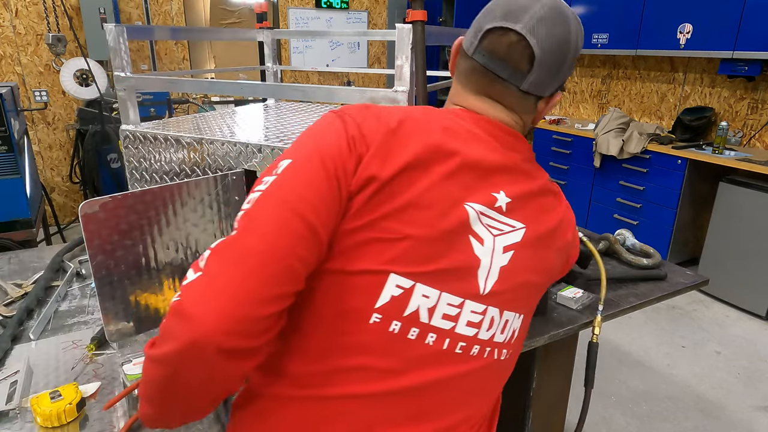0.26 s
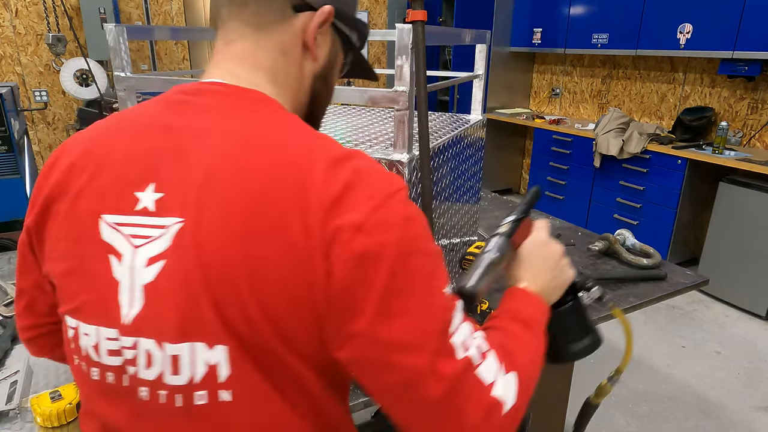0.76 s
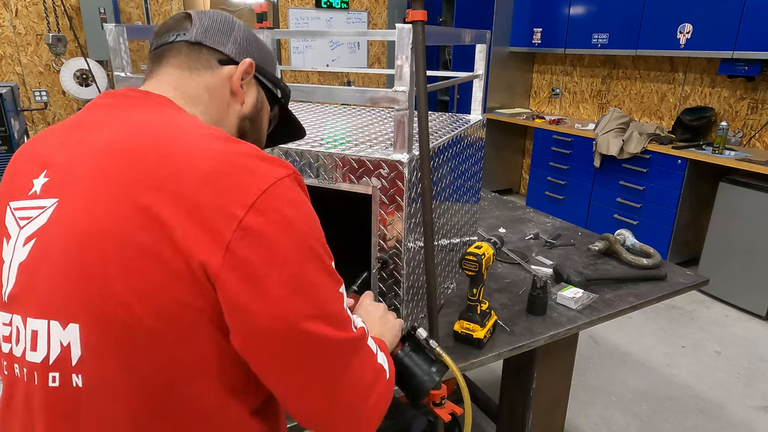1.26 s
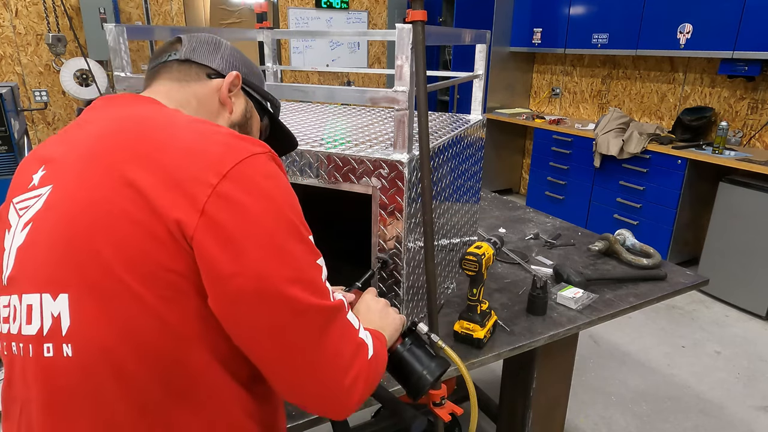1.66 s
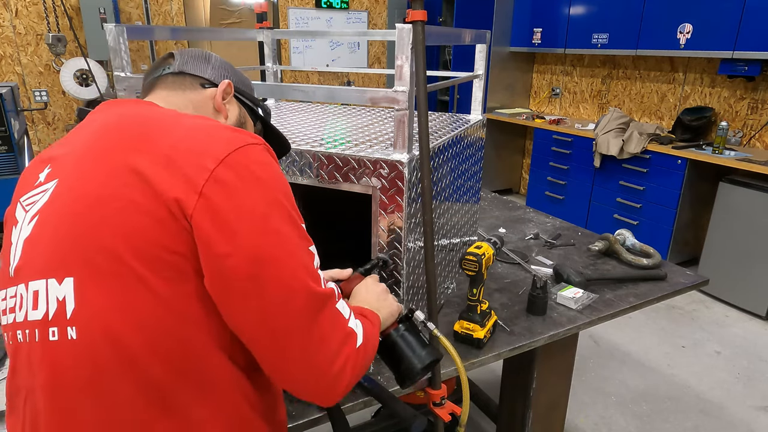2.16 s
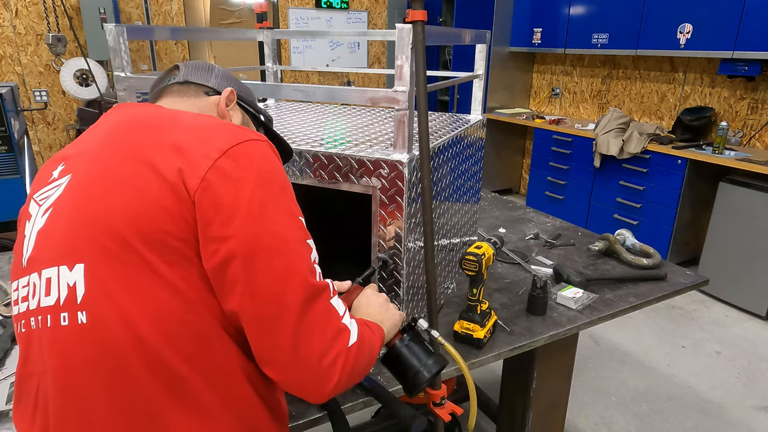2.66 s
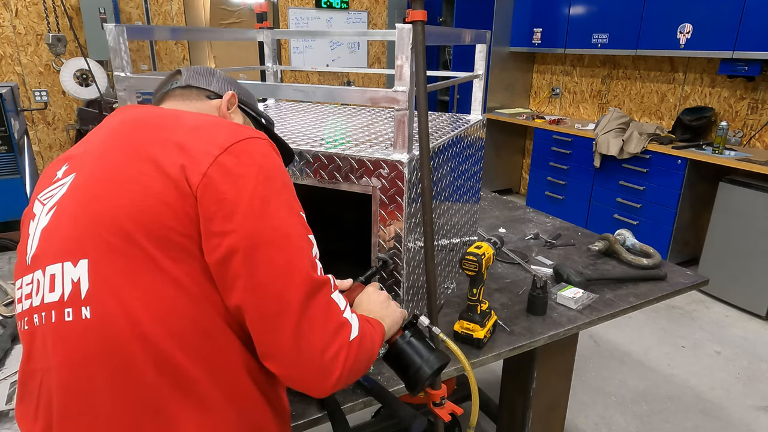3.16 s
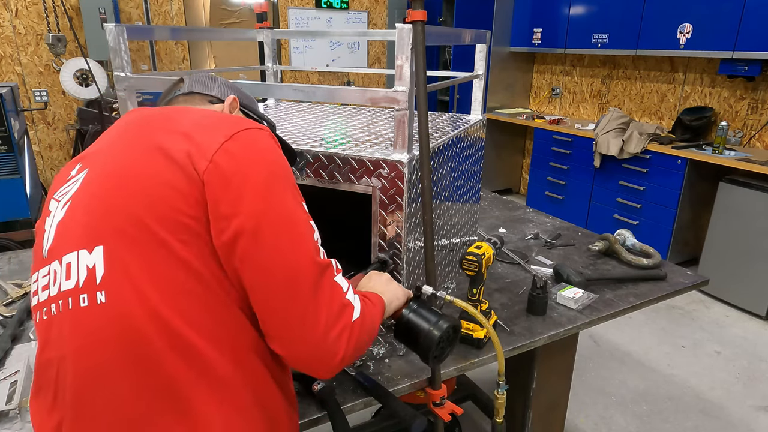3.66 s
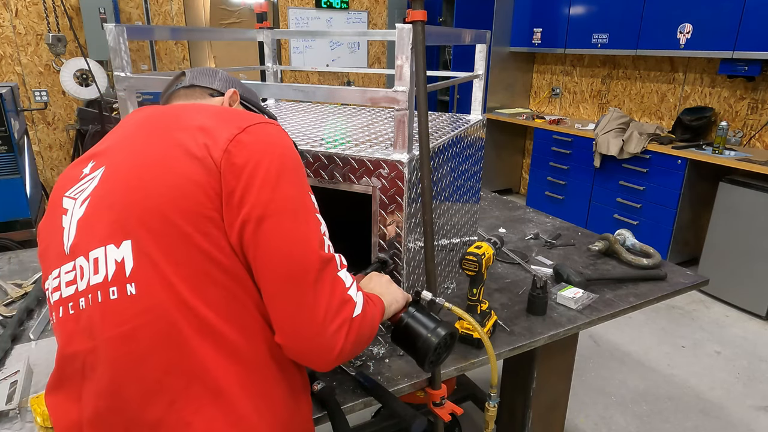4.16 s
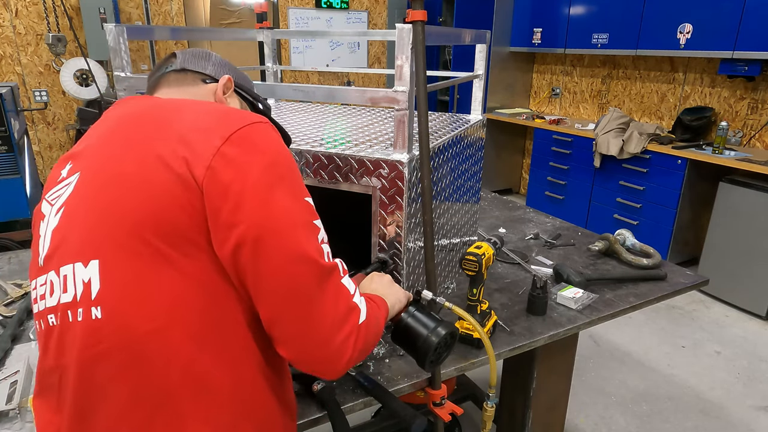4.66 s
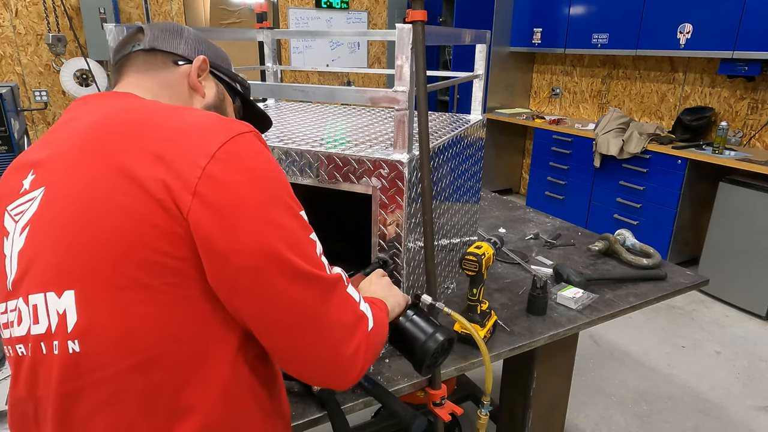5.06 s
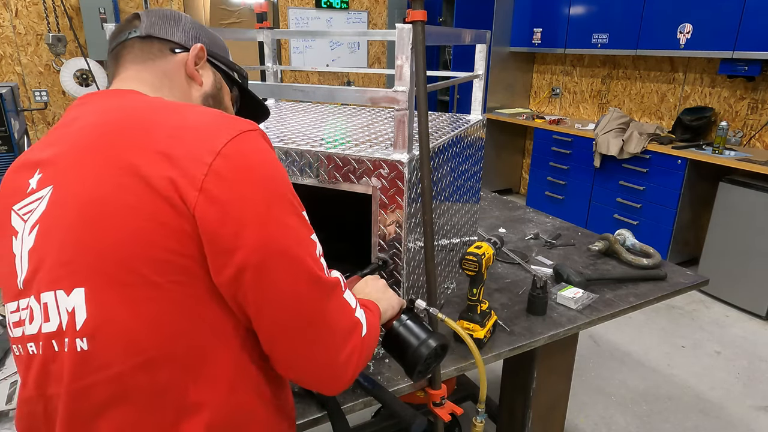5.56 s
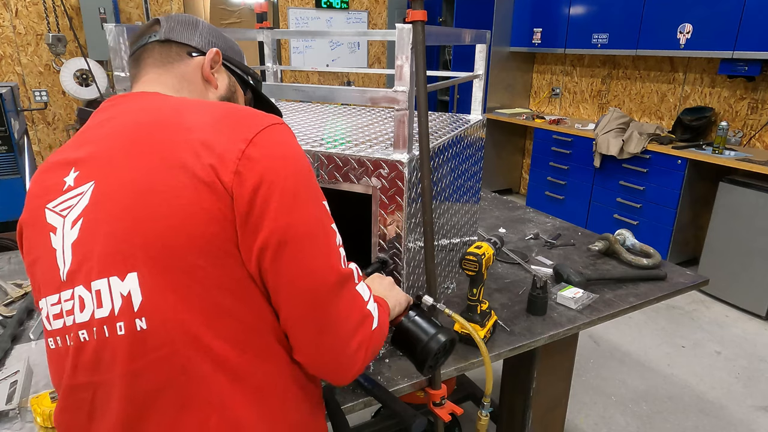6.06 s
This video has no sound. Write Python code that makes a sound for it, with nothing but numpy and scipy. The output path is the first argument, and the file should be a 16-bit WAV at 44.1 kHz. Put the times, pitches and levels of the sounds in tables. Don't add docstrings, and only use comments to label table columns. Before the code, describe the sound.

Metal knocks and scrapes on hollow aluminium panels, a leaking air hiss, one hard snap, a loud valve clack and air burst, echoing off hard walls.

```python
import sys
import numpy as np
from scipy import signal
from scipy.fft import rfft, irfft
from scipy.io import wavfile
from scipy.ndimage import uniform_filter1d

SR = 44100
rng = np.random.default_rng(int(sys.argv[2]) if len(sys.argv) > 2 else 0)


def makeup_ratio(level_db):
    decades = np.asarray(level_db, float) / 20
    return 10 ** decades


def to_wav(sig):
    pcm = np.clip(np.atleast_2d(sig), -1, 1) * 32767
    pcm = np.round(pcm).astype(np.int16)
    wavfile.write(sys.argv[1], SR, pcm.T)


N = 278267

# t/s, tick level/dB, treble slope/(dB per octave),
# thud level/dB, thud pitch/(octaves above 100 Hz)
BENCH = [
    (0.1526, -63, -8, -39, 3.3),
    (0.1945, -18, -24.5, -24.5, 2.6),
    (0.2015, -11.5, -19.5, -17, 2.94),
    (0.8003, -54.5, -7, -48, 2.2),
    (0.9485, -25.5, -17.5, -36, 2.7),
    (0.9765, -30.5, -15, -53, 2.7),
    (0.9945, -35, -14, -44, 1.4),
    (1.0165, -34.5, -12, -50, 2.3),
    (1.052, -43, -9, -47, 1.7),
    (1.0702, -42.5, -8, -55, 2),
]
NOSE = [(1.709, -56, -7.8, -28, 2.56), (1.7984, -43.25, -15, -43, 0.66), (2.0015, -30.5, -7, -11, 2.13),
        (2.0229, -16, -13, -11, 0.14), (2.0514, -26.5, -3.5, -10.5, 2.3), (2.1487, -16, -5.6, -15.5, 3.4),
        (2.1633, -49, -17, -4, 1.27), (2.2257, -14, -8.3, -9, 3.65), (2.3108, -48, -14.2, -20.5, 3.63),
        (2.7681, -35, -13.5, -20.5, 1.7), (3.0394, -33, -8, -21.5, 1.83), (3.329, -16.5, -14.5, -12, 2.22),
        (3.3645, -43, -24.9, -18, 3), (3.4189, -57, -15, -28, 4.2), (3.4362, -53, 3.5, -25.5, 0.2),
        (3.4995, -65.25, -13, -37.5, 0.71), (3.7973, -47, -18.5, -56.5, 0.3), (5.1617, -28, -6, -10, 2.24),
        (5.203, -29.5, -18.5, -19.5, 3.6), (5.2376, -50.25, 4, -18.5, 2.9),
        (5.6911, -24.5, -26.5, -10, 2.52), (5.719, -21.5, -32, -13.5, 2.36),
        (5.7799, -33.25, -12, -27, 2.8), (5.9122, -58, -1, -10, 1.5)]
PISTON = [
    (4.0785, -31, -8, -27, 2.63),
    (4.2462, -4.5, -8.5, -12, 3.8),
    (4.265, -14, -13, -16.5, 2.6),
    (5.9651, -16.5, -17, -17.5, 3.53),
    (5.9893, -36.5, -19, -21.5, 3.3),
    (6.008, -43, -24, -29.5, 4.4),
]
SLIDE = [(2.0914, -20.25, -7.5, 1.75, 1.68), (2.7468, -69.25, 0, -21.5, 3.03), (2.9976, -36, -13, -25, 0.5),
         (3.1314, -50.25, -21.1, -24.5, 3.07), (3.2624, -24, -22, -10, 1.97), (3.2894, -38, -21, -24, 3.1),
         (3.7189, -41, -23.3, -56.5, 2.8), (3.7578, -42, -5, -26, 0.3), (5.064, -14, -9.5, -13, 2),
         (5.0902, -42, -17, -18, 3), (5.6496, -57.5, -2.5, -26.5, 0.44), (5.8766, -29, 5, -8.5, 0.5)]
VALVE = [
    (4.0631, -20, -27, -15, 0.67),
    (4.8993, -3.5, -9.5, -15, 1.8),
    (4.9217, -13, 2.5, -33, 0.2),
    (5.8879, -24, -4.5, -9, 2),
]
TICK_HZ, TICK_RISE_DB = 2960, 8.5
THUD_RISE_DB, THUD_FALL_DB = 3.5, 9
BASS_HZ, BASS_OCTAVES = 262, 1.3

# f/Hz, level/dB, t60/s
BOX = [(126.0, -13.5, 2.5), (219.7, -4.5, 1.34), (259.85, -49, 1.7), (346.9, 4.5, 0.17), (507.3, -4, 0.46),
       (522.0, -11.0, 0.377), (679.0, -4.5, 0.42), (769.0, -9, 0.41), (914, -80, 1.53), (1063.0, 1.5, 0.28),
       (1286.0, -13.0, 0.416), (1286.0, -20.0, 0.4), (1400, -29, 0.763), (1465.8, -13.5, 0.996),
       (1566, -5, 0.38), (1616, -6.5, 0.87), (1820.0, -4.5, 0.287), (2150.0, -41, 0.183),
       (2225, -41, 0.187), (2526, -22.0, 0.1914), (2473.3, -31.5, 0.15), (2680.0, -12.0, 0.12),
       (2680, -15.0, 0.254), (2910.0, -10.5, 0.1663), (2950, -20.0, 0.349)]

# t/s, peak level/dB
SLEEVE = [(1.71, -37), (1.7963, -42.5), (2.024, -24), (2.0531, -15), (2.7482, -43.5), (2.999, -42),
          (3.2914, -41), (3.7584, -42.5), (4.0994, -39), (4.2644, -25.5)]
JAWS = [(1.8194, -41.5), (2.2344, -14), (3.0066, -41), (3.7189, -39), (4.0791, -16), (4.9257, -4),
        (5.1194, -30), (5.2026, -18), (5.6944, -14), (5.903, -20)]
LEVER = [(0.1545, -41), (1.711, -32), (3.3333, -24.5), (4.079, -21), (4.0905, -15), (5.895, -16)]
STEMS = [(1.708, -54), (4.9247, -13.5), (5.1055, -30), (5.2016, -32.5)]
CORNER = [(1.711, -35), (1.745, -36), (1.775, -32), (1.801, -33.5), (2.238, -20), (5.093, -26),
          (5.241, -17), (5.697, -18.5)]
WALL = [(0.268, -26), (2.026, -13.5), (2.163, -9), (2.232, -7), (3.042, -37.5), (3.333, -13.5),
        (3.418, -14), (5.158, -12)]
FACE = [(2.003, -17), (2.027, -15), (5.158, -15), (5.692, -8), (5.712, -8), (5.968, -9)]
# f/Hz, t60/s
PARTS = [
    (5690, 0.048),
    (3146, 0.055),
    (2190, 0.026),
    (8400, 0.053),
    (1034, 0.077),
    (335.5, 0.18),
    (512, 0.1),
]
PITCH_SCATTER = 0.022

# t/s, peak level/dB, f/Hz
SQUEAKS = [(4.0785, -17, 3080), (4.0895, -21, 2140), (5.2, -25, 3170), (5.902, -24, 3150),
           (5.695, -20, 3350)]

# t/s, level/dB
AIR = [
    [(4.054, -44), (4.064, -32), (4.08, -39), (4.144, -42), (4.226, -44), (4.235, -66)],
    [(4.33, -34), (4.38, -42), (4.494, -40.5), (4.736, -36.5), (4.862, -40), (4.89, -80)],
    [(4.9, -42), (4.91, -21), (4.928, -32), (5.032, -46), (5.19, -49), (5.2, -59), (5.3, -77)],
    [(5.885, -32), (5.891, -30), (5.957, -47), (5.967, -45), (6.055, -41), (6.31, -40.5)],
]
# f/Hz, level/(dB per Hz)
PULL = [(2650, -22), (4500, -13.5), (4980, -8.5), (5330, -30), (5480, -2.5), (6420, -18.5), (7900, 3),
        (9560, -4), (10800, -9), (12100, -8), (16000, -12.5)]
LEAK = [(1180, -43), (2000, -10.5), (2220, -27), (2440, 0), (2930, -9), (3810, -8), (4820, -11), (5580, -8),
        (6760, -8.5), (7770, -2.5), (9250, -4.5), (15200, -16), (16000, -11)]
PUFF = [(290, -31.5), (500, -18), (773, -2), (933, -6), (1140, -17), (3060, 10.5), (4400, -7), (5550, 4),
        (7000, -5), (8960, 3.5), (16000, -33.5)]
# f/Hz, width/Hz, level/dB
WHISTLES = [(7760, 450, -12), (11700, 900, -15.5), (9800, 700, -19)]
# f/Hz, width/Hz, level/dB
PULL_TONE = (5480, 200, -6)

# t/s, peak level/dB, length/s
THUMPS = [
    (4.245, -23.5, 0.017),
    (4.905, -37.5, 0.013),
]
BRUSH_S, BRUSH_PEAK_S, BRUSH_END_S, BRUSH_DB = 0.951, 1.078, 1.108, -45

# f/Hz, colour/dB, t60/s, early cluster level/dB
SHOP = [(40, -17, 0.61, -6), (90.2, 6, 1.4, -6), (138, 1, 1.21, -4), (370, 4, 1.225, 2),
        (577, 2.5, 1.29, 5.5), (880, 4, 1.33, 10), (1410, 3.5, 1.02, 10.5), (2990, 3.5, 0.67, 4.5),
        (3593, 0, 1.05, 11.5), (4745, -1, 0.41, -9.5), (5830, -2.5, 0.94, 12.5), (7140, -1, 0.63, -1),
        (11000, 2, 0.13, 3.5), (14760, -20, 0.43, 1.5)]
# f/Hz, side minus mid level/dB
WIDTH = [(60, -32), (110, -42.5), (200, -41), (380, -44), (700, -43), (1290, -37), (2380, -35), (4400, -29),
         (8120, -21), (15000, -17.5)]
EDGES_HZ = 40 * 2 ** np.arange(0, 8.8, 1 / 3)
# f/Hz, level/(dB per Hz)
FLOOR = [(12, -4), (20, -2), (86, -13.5), (138, -16), (168, -18.5), (357, -16.5), (542, -22), (642, -22),
         (923, -25.5), (1000, -13), (1330, -25), (1960, -18.5), (2600, -22.5), (4810, -24.5), (16000, -41)]
FLOOR_DB = -57.5


def blows(table, contact_s, gain_db, bass_db, rise_s=0.0001):
    s, tick_db, edge_db, thud_db, octave = np.transpose(table)
    at = (s * SR).astype(int)
    fade, swell = np.exp(-1 / (np.array([contact_s, rise_s]) * SR))
    first, last = at.min(), min(at.max() + SR // 2, N)
    white = rng.standard_normal((2, N))[:, first:last]
    out = np.zeros(N)
    for k, (sos, hz) in enumerate(bands()):
        over_tick = np.log2(hz / TICK_HZ)
        over_thud = np.log2(hz / 100) - octave
        tick = makeup_ratio(tick_db + (edge_db if over_tick > 0 else TICK_RISE_DB) * over_tick)
        thud = makeup_ratio(thud_db + np.minimum(THUD_RISE_DB * over_thud, -THUD_FALL_DB * over_thud))
        deep = np.clip(np.log2(BASS_HZ / hz), 0, BASS_OCTAVES)
        strikes = np.full(last - first, 1e-12)
        strikes[at - first] = makeup_ratio(gain_db + bass_db * deep) * np.hypot(tick, thud)
        source = strikes * np.sqrt(contact_s * SR / 2)
        if hz * contact_s >= 2:
            envelope = signal.lfilter([1 - swell], np.convolve([1, -fade], [1, -swell]), strikes)
            push = 0.67 * source * (contact_s < 0.01)
            source = push + 0.5 * white[k % 2] * envelope
        sign = (-1) ** k
        out[first:last] += sign * makeup_ratio(at_hz(SHOP, hz)) * signal.sosfilt(sos, source)
    return out


def box(force):
    out = np.zeros(N)
    for hz, level_db, t60 in BOX:
        r = makeup_ratio(-60 / (min(t60, 1.2) * SR))
        w = 2 * np.pi * hz / SR
        gain = makeup_ratio(level_db - 51.0) * np.sin(w)
        out += signal.lfilter([0, gain], [1, -2 * r * np.cos(w), r * r], force)
    return out


def pings():
    out = np.zeros(N + SR)
    t = np.arange(SR // 4) / SR
    for rows, (part_hz, t60) in zip((SLEEVE, JAWS, LEVER, STEMS, CORNER, WALL, FACE), PARTS):
        for s, level_db in rows:
            hz = part_hz * (1 + PITCH_SCATTER * rng.standard_normal())
            slow = signal.butter(2, hz * 0.17, fs=SR, output="sos")
            flutter = rms_one(signal.sosfilt(slow, rng.standard_normal(len(t))))
            tone = makeup_ratio(level_db - 4.0 - 60 * t / t60) * np.sin(2 * np.pi * hz * t)
            at = round(s * SR)
            out[at:at + len(t)] += tone * (0.96 + 0.91 * flutter)
    return out[:N]


def squeaks():
    rise_s, t60_s = 0.002, 0.045
    out = np.zeros(N)
    for s, level_db, hz in SQUEAKS:
        t = np.maximum(np.arange(N) / SR - s, 0)
        out += makeup_ratio(level_db - 60 * t / t60_s) * (1 - np.exp(-t / rise_s)) * np.sin(2 * np.pi * hz * t)
    return out


def air():
    t, out = np.arange(N) / SR, np.zeros(N)
    tones, pull_tone = whistles(WHISTLES), whistles([PULL_TONE])
    gains_db, whistles_db = (3.5, 1, 8.7, 2.1), (3.5, 1.5, -14.5, 1)
    for rows, spectrum, gain_db, whistle_db in zip(AIR, (PULL, LEAK, PUFF, LEAK), gains_db, whistles_db):
        s, level_db = np.transpose(rows)
        gate = np.clip((t - s[0]) / 0.00294, 0, 1) * (t < s[-1] + 0.008)
        flow = gate * makeup_ratio(np.interp(t, s, level_db) + gain_db + 1.6 * drift(25.09))
        jet = coloured(spectrum) + makeup_ratio(whistle_db) * tones
        if spectrum is PULL:
            jet = jet + pull_tone
        out += flow * jet
    return out


def whistles(jets):
    out = np.zeros(N)
    for hz, width, level_db in jets:
        b, a = signal.iirpeak(hz, hz / width, fs=SR)
        tone = signal.lfilter(b, a, signal.lfilter(b, a, rng.standard_normal(N)))
        out += makeup_ratio(level_db + 3.5 * drift(7.0)) * rms_one(tone)
    return out


def thumps():
    out = np.zeros(N)
    for s, level_db, length_s in THUMPS:
        u = np.maximum(np.arange(N) / SR - s, 0) / length_s
        out += makeup_ratio(level_db + 7.5) * np.sin(2 * np.pi * u) * np.exp(-1.5 * u)
    return out


def brush():
    s = [BRUSH_S - 0.003, BRUSH_S, BRUSH_PEAK_S - 0.04, BRUSH_PEAK_S, BRUSH_END_S, BRUSH_END_S + 0.012]
    swell_db = np.interp(np.arange(N) / SR, s, [-60, -6, -7, 3.5, -6, -60])
    soft = signal.butter(2, [300, 1300], "band", fs=SR, output="sos")
    cloth = signal.sosfilt(soft, rng.standard_normal(N))
    return makeup_ratio(BRUSH_DB + swell_db) * rms_one(cloth)


def shop(x, near_db=-12, early_s=0.06, build_s=0.0028):
    t = np.arange(2 * SR) / SR
    white = rng.standard_normal((2, 2, 2 * SR))
    tail = np.zeros((2, 2 * SR))
    for k, (sos, hz) in enumerate(bands()):
        early = 1 + makeup_ratio(at_hz(SHOP, hz, order=3)) * np.exp(-t / early_s)
        decay = makeup_ratio(-60 * t / at_hz(SHOP, hz, order=2)) * early
        tail += signal.sosfilt(sos, white[k % 2]) * decay * [[1], [makeup_ratio(at_hz(WIDTH, hz))]]
    tail *= (1 - np.exp(-t / build_s)) * makeup_ratio(-42.5)
    tail[0, 0] += makeup_ratio(near_db)
    return signal.fftconvolve(x[None], tail, axes=1)[:, :N]


def floor():
    return makeup_ratio(FLOOR_DB) * coloured(FLOOR)


def coloured(spectrum):
    hz = np.maximum(np.fft.rfftfreq(N, 1 / SR), 1)
    return rms_one(irfft(rfft(rng.standard_normal(N)) * makeup_ratio(at_hz(spectrum, hz)), N))


def drift(rate):
    knots = rng.standard_normal(200)
    return np.interp(np.arange(N) / SR * rate, np.arange(200), knots)


def bands():
    return [(signal.butter(2, [low, high], "band", fs=SR, output="sos"), np.sqrt(low * high))
            for low, high in zip(EDGES_HZ, EDGES_HZ[1:])]


def at_hz(rows, hz, order=1):
    rows = np.array(rows)
    return np.interp(np.log(hz), np.log(rows[:, 0]), rows[:, order])


def rms_one(x):
    return x / np.sqrt(np.mean(x ** 2) + 1e-30)


def scene():
    on_box = blows(NOSE, contact_s=0.0041, gain_db=12.5, bass_db=2.5)
    on_box += blows(SLIDE, contact_s=0.0214, gain_db=5.5, bass_db=0.0, rise_s=0.0051)
    piston = blows(PISTON, contact_s=0.00335, gain_db=25.5, bass_db=2)
    off_box = blows(BENCH, contact_s=0.015, gain_db=17.5, bass_db=-14, rise_s=0.00073)
    off_box += blows(VALVE, contact_s=0.01, gain_db=10.0, bass_db=-2.5, rise_s=0.00061)
    ringing = box(on_box + makeup_ratio(-9) * piston)
    parts = pings()
    mid, side = shop(off_box + on_box + piston + ringing + makeup_ratio(-5.5) * parts + air())
    mid = mid + makeup_ratio(-6.0) * parts + thumps() + brush() + squeaks() + floor()
    side = side + makeup_ratio(-20.5) * floor() + makeup_ratio(-50) * mid
    return np.array([mid + side, mid - side])


def roll_off(x):
    return signal.sosfilt(signal.butter(12, 15900, fs=SR, output="sos"), x)


def record(dry):
    t = np.arange(N) / SR
    level_db = 10 * np.log10(uniform_filter1d(dry.mean(0) ** 2, size=256) + 1e-12)
    over_db = np.maximum(level_db + 9.5, 0)
    held_db = np.maximum.accumulate(over_db + 25 * t) - 25 * t
    ahead = round(0.012 * SR)
    quick_db = 0.16 * uniform_filter1d(np.append(held_db[ahead:], held_db[-ahead:]), ahead)
    lag = np.exp(-1 / (0.0414 * SR))
    slow_db = 0.87 * signal.lfilter([1 - lag], [1, -lag], held_db)
    mix = np.clip(dry * makeup_ratio(-quick_db - slow_db), -1, 1)
    return roll_off(mix)


dry = scene()
out = record(dry)
to_wav(out)
```